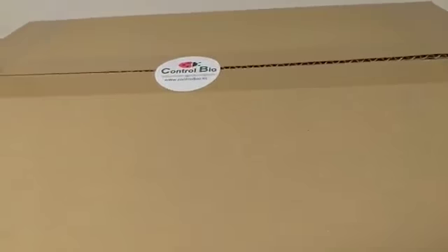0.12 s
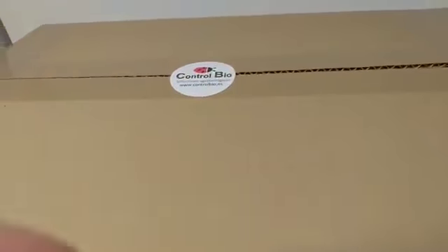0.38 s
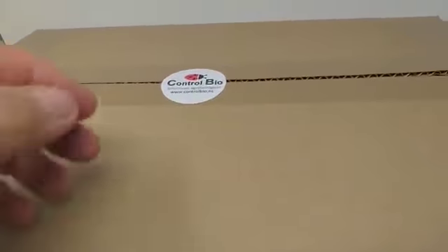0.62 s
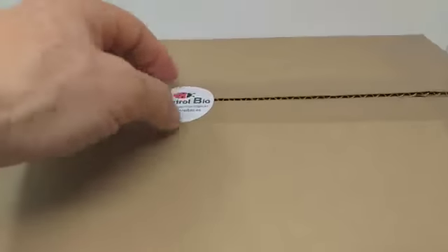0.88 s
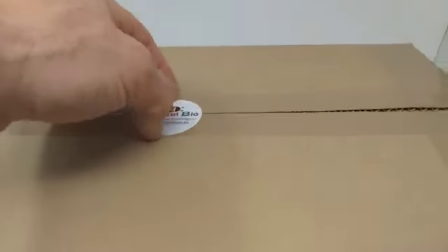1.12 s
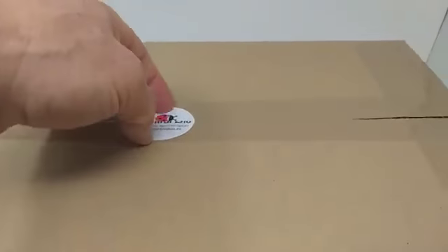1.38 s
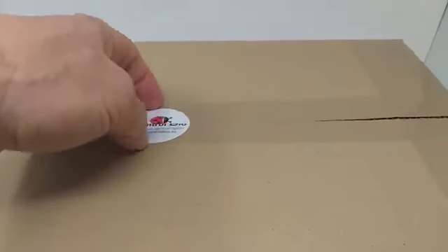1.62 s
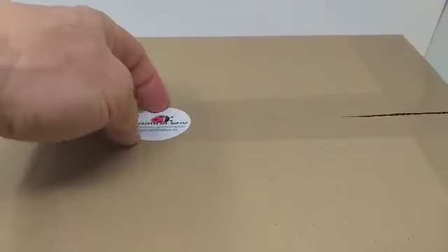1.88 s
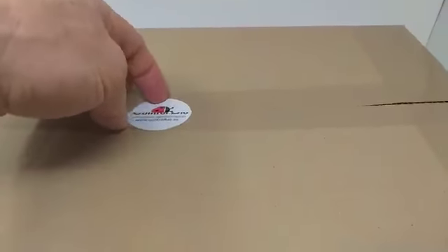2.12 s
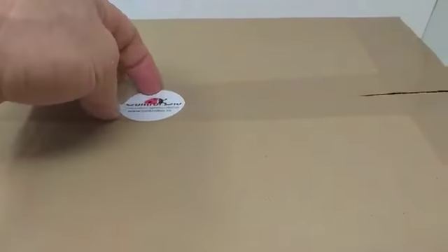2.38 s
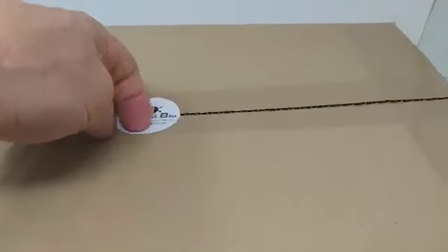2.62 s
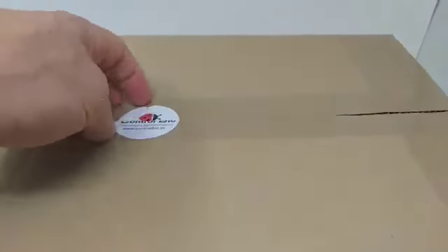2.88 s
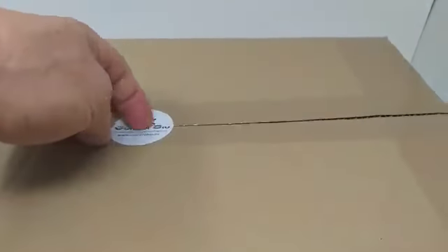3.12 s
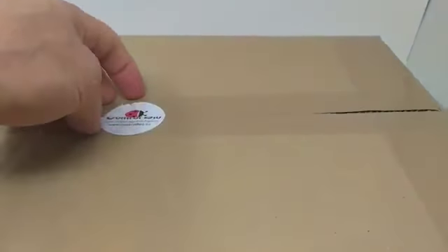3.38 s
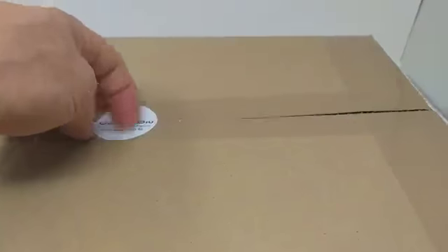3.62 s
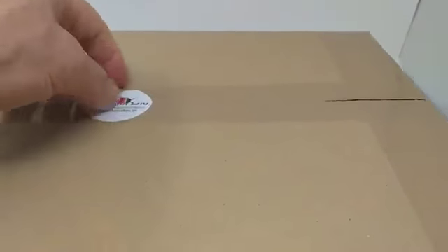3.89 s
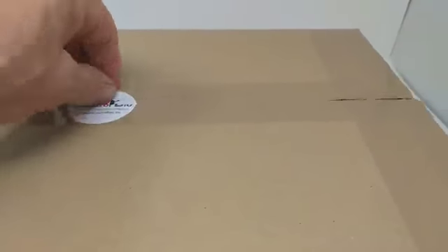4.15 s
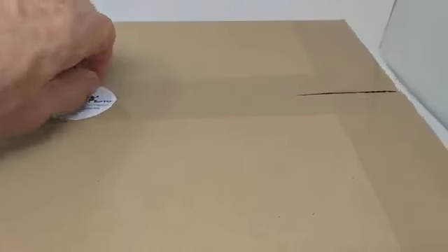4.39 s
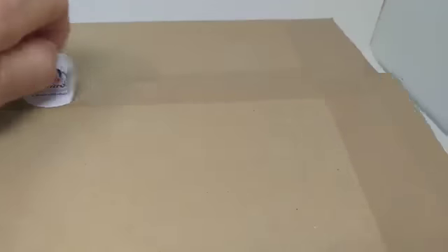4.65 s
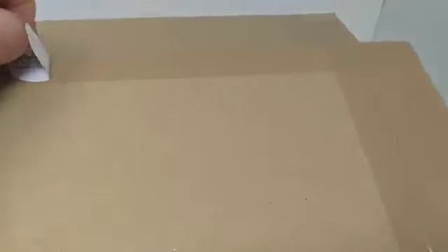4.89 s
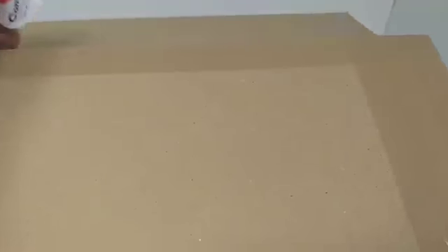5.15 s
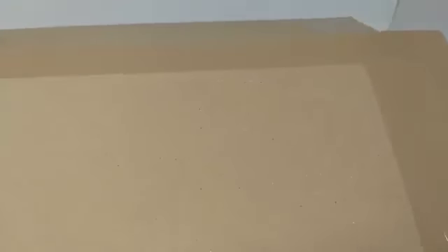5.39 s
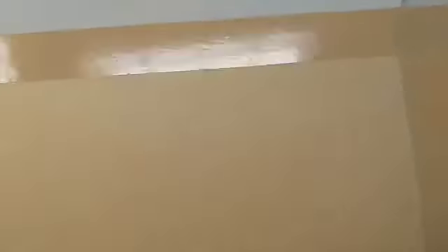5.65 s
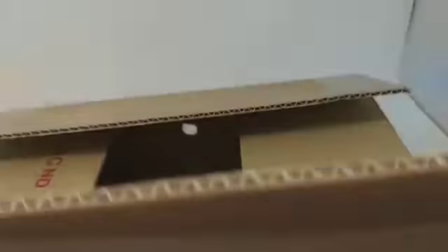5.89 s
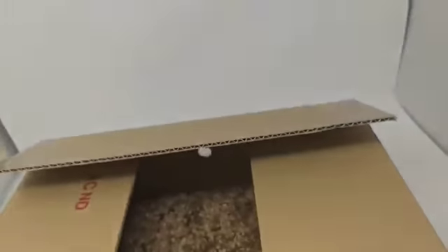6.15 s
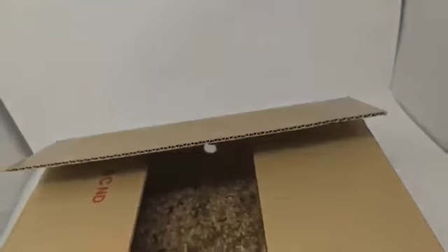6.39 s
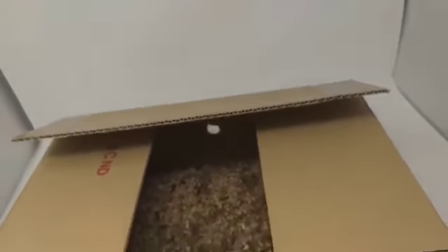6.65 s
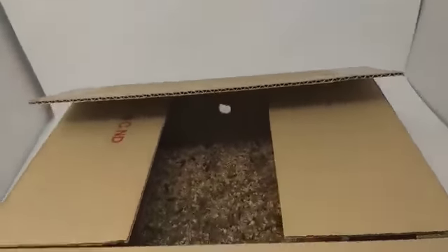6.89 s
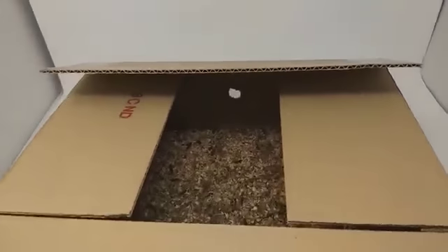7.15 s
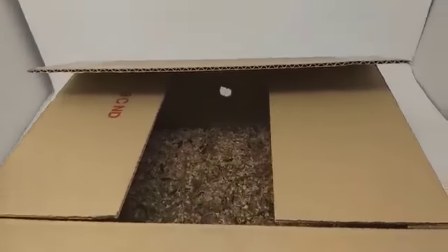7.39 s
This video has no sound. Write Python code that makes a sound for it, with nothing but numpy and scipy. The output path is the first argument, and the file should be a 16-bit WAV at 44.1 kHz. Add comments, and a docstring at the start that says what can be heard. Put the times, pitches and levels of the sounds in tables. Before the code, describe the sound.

Fingernail scrapes and hollow thumps on a cardboard box, then a seal ripped off in two crackling bursts, then soft hissing flap slides.

```python
"""First a finger rubs and its nail catches on a paper seal on a hollow cardboard box, and the lid thumps.
Then the seal is peeled off in jerks: each slip of the glue is a click with a crackling tail.
Last, the lifted flaps slide on each other with a bright hiss and two wandering resonances.
Each contact is rough noise that also shakes the board panels and makes the hollow box boom.
Throughout: a small hard-walled room, a faint electrical whine and the hiss of a close mono microphone."""
import sys
import numpy as np
from scipy import signal
from scipy.fft import rfft, irfft
from scipy.io import wavfile

SR = 44100
rng = np.random.default_rng(int(sys.argv[2]) if len(sys.argv) > 2 else 0)


def convert_level_to_amplitude(level_db):
    """Map a level in decibels to its linear amplitude factor."""
    exponent = np.asarray(level_db, float) / 20
    return 10 ** exponent


def dump_mix(stems):
    """Bounce the given channels to the path in sys.argv[1] as a 16-bit WAV at rate SR."""
    frames = np.atleast_2d(stems).T  # one column per channel
    limited = np.clip(frames, -1, 1)  # hard clip at full scale
    pcm = np.round(limited * 32767).astype(np.int16)
    wavfile.write(sys.argv[1], SR, pcm)


N = 331632   # length in samples


# a finger slides on the lid, or the box rumbles on after a thump; one row each: start_s, held_s,
# surface_hiss_db, panel_db, cavity_db
RUBS_AND_RUMBLES = [(0.765, 0.083, -36.5, -47.5, -58), (0.875, 0.04, -46.5, -48, -54.5),
                    (0.95, 0.049, -54.5, -66, -45), (1.03, 0.07, -61, -73, -57.5), (1.14, 0.017, -58, -61, -44),
                    (1.455, 0.022, -33, -32, -31), (1.625, 0.024, -54.5, -50.5, -57),
                    (1.805, 0.012, -58.5, -60, -38), (1.855, 0.012, -54, -51, -51), (1.95, .01, -50.5, -55, -35),
                    (2.03, 0.073, -57, -68.5, -47.5), (2.44, 0.028, -69, -63.5, -69),
                    (2.6, 0.012, -45, -38.5, -26), (2.67, .12, -55, -59, -48.5), (3.0, 0.037, -52, -49, -35.5),
                    (3.18, .01, -48.5, -49.5, -31), (3.58, 0.019, -55.5, -65.5, -37.5),
                    (3.622, 0.0041, -32.5, -40, -41), (3.69, 0.0087, -61, -59.5, -24),
                    (3.9, 0.13, -57, -69, -56), (4.05, 0.056, -66.5, -64.5, -60.5),
                    (4.275, 0.043, -64, -65.5, -59), (4.735, 0.043, -43.5, -45.5, -36.5),
                    (4.87, 0.077, -52, -62, -56)]
# the hand lies on the lid: start_s, held_s, surface_hiss_db, panel_db, cavity_db
HAND_RESTS = [(0.8, 5, -86, -90, -65.5)]
# how a rub swells, falls and trails off; each list holds: surface, panel, cavity
RUB_RISE_DB_PER_S = [1699.5, 1499.5, 702]   # swell [dB per s]
RUB_FALL_DB_PER_S = [308, 399.5, 321.5]   # fast fall [dB per s]
RUB_TAIL_DB = [-32, -27, -15.5]   # where the slow tail starts, against the held level [dB]
RUB_TAIL_DB_PER_S = [72.5, 96.5, 73]   # fall of that tail [dB per s]
# the nail or a flap edge catches and scrapes free: start_s, surface_peak_db (nominal), panel_db, t60_s
CATCHES = [(0.1054, -21.5, -52, 0.023), (0.7535, -46, -70, 0.032), (1.1838, -35.5, -45, 0.051),
           (1.403, -22.5, -49, 0.028), (1.412, -34, -46, .15), (1.4247, -18, -23.5, 0.071),
           (1.5946, -40, -49, 0.079), (1.652, -34, -43, 0.045), (1.922, -22, -24, 0.039),
           (2.0226, -36, -42.5, 0.055), (2.2984, -42, -43, 0.052), (2.424, -42.5, -53.5, 0.051),
           (2.5391, -11.5, -15, 0.063), (2.5554, -18, -25, 0.11), (2.573, -14.5, -32, 0.1),
           (2.5863, -12.5, -27.5, 0.077), (2.9751, -28.5, -32.5, 0.067), (3.0869, -24, -42, 0.067),
           (3.1225, -8, -22, 0.092), (3.1567, -27, -29.5, 0.11), (3.1673, -18, -42, 0.076),
           (3.3121, -27.5, -54.5, 0.069), (3.398, -37, -51, 0.031), (3.5092, -31.5, -39.5, 0.12),
           (3.5636, -14.5, -14.5, 0.041), (3.6386, -30, -28, 0.03), (3.6438, -11.5, -17.5, 0.086),
           (3.6574, -20.5, -37, 0.11), (0.972, -31, -41, 0.035), (3.845, -46, -75, 0.21),
           (3.965, -47, -65, 0.059), (4.016, -47, -63, 0.049), (5.644, -32, -83, 0.044),
           (5.7762, -42, -68, 0.055), (5.8555, -43, -83.5, 0.05), (5.891, -43, -85.5, 0.062),
           (6.1454, -23, -64, 0.078), (6.2911, -31.5, -72, 0.083), (6.716, -15, -49, 0.029),
           (6.867, -21, -78.5, 0.058), (7.262, -13, -33, 0.12)]
# colour of rubbed paper: pitch_hz, relative level_db per Hz
PAPER_COLOUR = [(1470, -32), (2450, -14), (3300, -3.5), (4200, -5), (5300, -3.5), (5970, -5.5), (6730, 1.5),
                (8610, -1.5), (9780, -16), (13100, -12), (15000, -10.5)]
RUB_LOW_HZ = 880   # light rubbing hardly moves the slow panel modes
FIRM_DB = -43   # pressure up to this bends the lid locally (upper modes), more moves all of it


def fingers():
    """Rubbing skin and a catching nail make rough noise that drives surface, panels and cavity."""
    rub_surface, rub_panel, rub_cavity = strokes(
        RUBS_AND_RUMBLES + HAND_RESTS, RUB_RISE_DB_PER_S, RUB_FALL_DB_PER_S, RUB_TAIL_DB, RUB_TAIL_DB_PER_S)
    catch_surface, catch_panel = bursts(CATCHES, crest_db=11, rise_s=0.0033, snap=0.43, snap_s=0.0064)
    grip = flutter(80, depth_db=1.5)
    fibres = crackle(4000, spread_db=2.0, smooth=0.94)
    surface = np.hypot(grip * rub_surface, catch_surface * flutter(200, depth_db=3.5))
    high_pass = signal.butter(1, RUB_LOW_HZ, "high", fs=SR, output="sos")
    light = signal.sosfilt(high_pass, grip * rub_panel * fibres)
    gentle = np.minimum(rub_cavity, convert_level_to_amplitude(FIRM_DB))
    firm = rub_cavity - gentle
    boom = cavity(gentle * fibres, tilt_db=3.0) + cavity(firm * fibres, tilt_db=0.0)
    scrape = patchy(coloured(surface * fibres, PAPER_COLOUR), 16.0, depth_db=3.0)
    return scrape + shaken(light + catch_panel * fibres) + boom


# the glue lets go in jerks: start_s, surface_peak_db (nominal)
SLIPS = [(4.403, -11.5), (4.4316, -9), (4.458, -11), (4.4915, -16), (4.4958, -7.5), (4.507, -4.5),
         (4.5379, -5), (4.5551, -4.5), (4.5735, -2.5), (4.5987, 0), (4.6103, -4), (4.6317, -1), (4.6394, 2),
         (4.648, -4), (4.6664, 3), (4.67, 2), (4.68, -4), (4.6895, 2.5), (4.7206, -5), (4.797, -26.5),
         (4.812, -2.5), (4.8262, -4), (4.8394, -11.5), (5.003, -34), (5.0269, -9), (5.0365, -1.5),
         (5.0466, -8), (5.054, -8), (5.059, -4.5), (5.064, 0.5), (5.07, 3.5), (5.075, -1), (5.0806, -0.5),
         (5.0903, -3), (5.0971, 1.5), (5.119, -4)]
# how long a slip crackles on: time_s, t60_s
SLIP_T60 = [(4.4, 0.065), (4.6, 0.1), (4.72, 0.054), (5.03, 0.062), (5.06, 0.032), (5.1, 0.061),
            (5.12, 0.061)]
# pull of a slip on the panels: time_s, level_db against the surface peak
SLIP_TUG = [(4.4, -26.5), (4.49, -29.5), (4.55, -21), (4.69, -17.5), (4.82, -23), (5.12, -27)]
# fast pulls, where the slips run together: start_s, held_s, crackle_db, panel_db, seal_ring_db
TEARS = [(4.655, 0.033, -21.5, -25, -23), (5.058, .04, -25, -39.5, -20)]
# how a fast pull swells and falls; each list holds: crackle, panel, seal ring
TEAR_RISE_DB_PER_S = [653.5, 403, 652]   # swell [dB per s]
TEAR_FALL_DB_PER_S = [601, 497.5, 601]   # fall, also of the tail [dB per s]
# the taut seal rings where its free length puts it: time_s, pitch_hz
SEAL_RING = [(4.4, 4400), (4.48, 4000), (4.5, 2900), (4.573, 4500), (4.6, 2700), (4.64, 3400), (4.69, 3600),
             (4.72, 3500), (4.82, 4300), (5.04, 4000), (5.077, 4247), (5.12, 4380)]
# colour of tearing glue: pitch_hz, relative level_db per Hz
GLUE_COLOUR = [(900, -34), (1470, -17.5), (2500, -10.5), (4520, -4.5), (5060, -8), (7030, 0.5), (8740, -5),
               (9860, -15), (15000, -7)]
CRACK_DB = 7.5   # the single sharp click that opens each slip, over the slip's surface peak
SEAL_WIDTH_HZ, SEAL_SNAP_DB = 1200, -8.5   # width of the seal's ring; part of each slip that rings it
PEEL_TILT_DB, PEEL_LOW_HZ = 9.5, 163   # dB per octave, Hz: small quick tugs favour the upper box modes


def peeling():
    """Each slip of the glue line is a snap with a crackling tail that also shakes the box."""
    slip_s, slip_db = np.transpose(SLIPS)
    tug_db = slip_db + np.interp(slip_s, *np.transpose(SLIP_TUG))
    slip_t60 = np.interp(slip_s, *np.transpose(SLIP_T60))
    slips = list(zip(slip_s, slip_db, tug_db, slip_t60))
    slip_surface, slip_panel = bursts(slips, crest_db=12.0, rise_s=0.00015, snap=2.2, snap_s=0.00031)
    tears = strokes(TEARS, TEAR_RISE_DB_PER_S, TEAR_FALL_DB_PER_S, [-30] * 3, TEAR_FALL_DB_PER_S)
    tear_surface, tear_panel, tear_seal = tears * flutter(250, depth_db=2.0)
    surface = np.hypot(slip_surface, tear_surface)
    panels = np.hypot(slip_panel, tear_panel)
    glue = crackle(2500, spread_db=5.0, smooth=1.1)
    cracks = np.zeros(N)
    cracks[(slip_s * SR).astype(int)] = convert_level_to_amplitude(slip_db + CRACK_DB)
    seal = np.hypot(tear_seal, convert_level_to_amplitude(SEAL_SNAP_DB) * slip_surface)
    ring = moving_ring(seal * glue + convert_level_to_amplitude(SEAL_SNAP_DB) * cracks, SEAL_RING, SEAL_WIDTH_HZ)
    boom = cavity(convert_level_to_amplitude(1.0) * panels * glue, tilt_db=PEEL_TILT_DB)
    boom = signal.sosfilt(signal.butter(2, PEEL_LOW_HZ, "high", fs=SR, output="sos"), boom)
    tearing = patchy(coloured(surface * glue + cracks, GLUE_COLOUR), 60.0, depth_db=1.5)
    return tearing + ring + shaken(panels * glue) + boom


# the lifted flaps slide on each other: start_s, held_s, hiss_db, low_flap_ring_db, cavity_db
FLAP_STROKES = [(5.14, 0.0071, -39.5, -58, -42), (5.18, 0.032, -49, -68, -60),
                (5.24, 0.059, -55.5, -73, -74), (5.37, 0.083, -44.5, -60.5, -51.5),
                (5.52, 0.044, -61, -77, -64), (5.99, 0.097, -57.5, -93.5, -85.5),
                (6.16, 0.067, -41.5, -59, -60), (6.27, 0.15, -52, -62, -74),
                (6.47, 0.085, -49, -71.5, -72.5), (6.65, 0.023, -58, -72, -68.5),
                (6.695, 0.03, -36, -58.5, -62), (6.76, 0.14, -43.5, -64, -65),
                (6.92, .17, -41.5, -59.5, -59), (7.19, 0.019, -42, -55, -57),
                (7.268, 0.0079, -39, -38, -54.5), (7.35, 0.023, -46.5, -49.5, -54),
                (7.405, 0.0035, -33, -36.5, -45.5)]
# how a slide swells, falls and trails off; each list holds: hiss, low flap ring, cavity
FLAP_RISE_DB_PER_S = [345, 698.5, 400]   # swell [dB per s]
FLAP_FALL_DB_PER_S = [527, 559, 264]   # fast fall [dB per s]
FLAP_TAIL_DB = [-32, -53, -24]   # where the slow tail starts, against the held level [dB]
FLAP_TAIL_DB_PER_S = [9, 68, 34]   # fall of that tail [dB per s]
# the lower flap ring: time_s, pitch_hz
FLAP_LOW_RING = [(5.2, 1150), (6.2, 1084), (6.45, 1127), (6.72, 1150), (7.051, 1192), (7.27, 1129),
                 (7.42, 1085)]
# the upper flap ring wanders as the flap bends: time_s, pitch_hz, level_db against the hiss
FLAP_HIGH_RING = [(5.25, 1910, -14), (5.38, 1950, -11), (5.5, 1900, -13.5), (5.7, 1933, -3),
                  (6.161, 1944, -12), (6.319, 1763, -5.5), (6.549, 1787, -16), (6.718, 2037, -25),
                  (6.85, 1520, -19), (6.97, 2150, -14), (7.269, 1760, -16), (7.449, 1897, -15)]
# colour of rubbed board: pitch_hz, relative level_db per Hz
BOARD_COLOUR = [(1350, -37), (1500, -12), (2250, -14.5), (2600, -19), (2850, -14.5), (3250, -9.5),
                (3900, -10), (4800, -3), (5500, -2.5), (6400, -5), (7290, -0.5), (8900, -10),
                (10100, -21.5), (12900, -12), (15000, -12)]


def flaps():
    """Board slides on board: bright hiss, two broad flap resonances and the cavity below."""
    hiss, low, boom = strokes(
        FLAP_STROKES, FLAP_RISE_DB_PER_S, FLAP_FALL_DB_PER_S, FLAP_TAIL_DB, FLAP_TAIL_DB_PER_S)
    ring_s, ring_hz, ring_db = np.transpose(FLAP_HIGH_RING)
    high = hiss * convert_level_to_amplitude(np.interp(np.arange(N) / SR, ring_s, ring_db))
    fibres = flutter(60, depth_db=1.5) * crackle(2500, spread_db=3.0, smooth=0.97)
    low_force = low * fibres * flutter(20, depth_db=1.5)
    high_force = high * fibres * flutter(20, depth_db=6.0)
    rung = moving_ring(low_force, FLAP_LOW_RING, width_hz=230)
    rung += moving_ring(high_force, np.c_[ring_s, ring_hz], width_hz=360)
    rung += shaken(convert_level_to_amplitude(-10) * np.hypot(low, high) * fibres)   # the other panels shake along
    rubbing = patchy(coloured(hiss * fibres, BOARD_COLOUR), 14.0, depth_db=3.5)
    return rubbing + rung + cavity(boom * fibres, tilt_db=6.5)


# the lid springs back under the finger: start_s, peak_db, strongest pitch_hz, build_up_s
THUMPS = [(1.178, -28, 231, 0.019), (1.427, -18.5, 220, 0.0044), (1.432, -23.5, 125, 0.0013),
          (1.797, -32, 200, 0.023), (1.921, -19.5, 344, 0.0049), (2.025, -29.5, 267, 0.0045),
          (2.541, -5, 357, 0.0064), (2.552, 5.5, 155, 0.002), (2.979, -17.5, 133.6, 0.0084),
          (3.124, -12.5, 343, 0.01), (3.1364, -1, 150, 0.0015), (3.178, -17.5, 132, 0.0075),
          (3.563, -16, 350, 0.0039), (3.568, -9.5, 130.3, 0.004), (3.646, -9.5, 320, 0.0027),
          (3.6585, 6, 168, 0.0018), (2.299, -41.5, 215, 0.008), (2.734, -34, 135, 0.012),
          (3.398, -33.5, 148, 0.0062), (3.509, -24.5, 142, 0.011), (4.015, -44.5, 200, 0.0089),
          (5.034, -20, 201, 0.0068), (5.109, -27.5, 126.2, .02), (5.17, -42, 129.6, 0.021),
          (5.375, -47.5, 125, 0.0099), (5.456, -46, 486, .03), (5.637, -52, 128.6, 0.0095),
          (5.668, -41.5, 127, 0.0042), (7.427, -44, 127, 0.0076)]
# the box as a drum, one row a mode: pitch_hz, relative level_db, t60_s (before the hand shortens it)
BOX_MODES = [(106, -15.5, 0.29), (111, -2.5, 0.15), (129.8, 4.5, 0.12), (133, 2.5, 0.089),
             (188, -0.5, 0.078), (219, 4, 0.052), (273, -4, 0.037), (341.6, -11, 0.11), (350, -13.5, 0.14),
             (460, -10, 0.067)]
RING_LEFT, RING_LOST_PER_OCTAVE = 1, 0.23   # share of ring time the hand leaves; high pushes keep less


def thumps(spread_octaves=0.45):
    """Each push builds up, favours the modes near its own pitch, and the hand shortens their ring."""
    t = np.arange(SR // 2) / SR
    out = np.zeros(N + SR)
    for start, peak_db, hz, build_s in THUMPS:
        after = np.maximum(t - build_s, 0)
        left = max(RING_LEFT - RING_LOST_PER_OCTAVE * np.log2(hz / BOX_MODES[0][0]), .1)
        ring = np.zeros(len(t))
        for mode_hz, db, t60 in BOX_MODES:
            nearness = np.exp(-.5 * (np.log2(mode_hz / hz) / spread_octaves) ** 2)
            ring += nearness * convert_level_to_amplitude(db - 60 * after / (t60 * left)) * np.sin(2 * np.pi * mode_hz * t)
        ring *= np.minimum(t / max(build_s, .001), 1)
        at = round(start * SR)
        out[at:at + len(t)] -= convert_level_to_amplitude(peak_db) * ring / np.abs(ring).max()   # the lid first moves away
    return out[:N]


def cavity(force, tilt_db):
    """A running force sets all the box modes ringing, tilted per octave; noise of rms 1 gives rms 1."""
    t = np.arange(SR // 2) / SR
    ring = np.zeros(len(t))
    for hz, db, t60 in BOX_MODES:
        tilted_db = db + tilt_db * np.log2(hz / BOX_MODES[0][0])
        ring += convert_level_to_amplitude(tilted_db - 60 * t / t60) * np.sin(2 * np.pi * hz * t)
    return signal.oaconvolve(force, ring / np.sqrt(np.sum(ring ** 2)))[:N]


# colour of shaken board: pitch_hz, relative level_db per Hz
PANEL_COLOUR = [(260, -30.5), (465, 0.5), (610, -8.5), (720, -6), (960, -10), (1240, -6), (1400, -12.5),
                (1550, -8.5), (2230, -17.5), (2800, -16.5), (3640, -52.5), (6160, -120)]


def shaken(force):
    """A force shakes the panels; their colour shifts as the contact moves."""
    return patchy(coloured(force, PANEL_COLOUR), 25.0, depth_db=4.0)


def moving_ring(x, centre, width_hz):
    """A broad resonance whose centre follows (s, Hz) rows; white rms 1 gives rms 1."""
    hz = np.interp(np.arange(N) / SR, *np.transpose(centre))
    slow = signal.sosfilt(signal.butter(3, width_hz / 2, fs=SR, output="sos"), x)
    carrier = np.cos(2 * np.pi * np.cumsum(hz) / SR)   # lifts the slow noise up to the ring's pitch
    return slow * np.sqrt(2 * SR / width_hz) * carrier


def strokes(rows, rise_db_s, fall_db_s, tail_db, tail_db_s):
    """Gains in time for each level column: swell, hold, fast fall and slow tail of all strokes."""
    t = np.arange(0, N + 32, 32) / SR   # one point every 32 samples
    power = 1e-20
    for start, held, *levels in rows:
        before = np.maximum(start - t, 0)
        after = np.maximum(t - start - max(held, 0), 0)
        swell = convert_level_to_amplitude(np.c_[levels] - np.outer(rise_db_s, before))
        tail = convert_level_to_amplitude(np.c_[tail_db] - np.outer(tail_db_s, after)) * (after > 0)
        fall = convert_level_to_amplitude(-np.outer(fall_db_s, after)) + tail
        power = power + (swell * np.minimum(fall, 1)) ** 2
    return np.array([np.interp(np.arange(N) / SR, t, np.sqrt(p)) for p in power])


def bursts(events, crest_db, rise_s, snap, snap_s):
    """Envelopes of surface and panel: a sharp first snap at each event, then an exponential fall."""
    t = np.arange(SR // 2) / SR
    power = np.zeros((2, N + SR))
    for start, surface_db, panel_db, t60 in events:
        fall = convert_level_to_amplitude(-60 * t / max(t60, .005))
        shape = (1 - np.exp(-t / rise_s)) * fall * (1 + snap * np.exp(-t / snap_s))
        levels = convert_level_to_amplitude(np.array([[surface_db - crest_db], [panel_db]]))   # crest: peak over rms
        at = round(start * SR)
        power[:, at:at + len(t)] += (levels * shape) ** 2
    return np.sqrt(power[:, :N])


def crackle(per_s, spread_db, smooth):
    """Random snaps of uneven size over a share of smooth noise; rms 1."""
    sizes = convert_level_to_amplitude(spread_db * np.minimum(rng.exponential(1, N), 4)) * rng.choice([-1, 1], N)
    snaps = rms_one(sizes * (rng.random(N) < per_s / SR))
    return rms_one(snaps + smooth * rng.standard_normal(N))


def flutter(per_s, depth_db):
    """A gain that wanders as the contact grips and loosens."""
    knots = rng.standard_normal(int(N / SR * 400) + 2)   # enough for the fastest flutter
    place = np.arange(N) / SR * np.clip(per_s, 1, 399)
    return convert_level_to_amplitude(depth_db * np.interp(place, np.arange(len(knots)), knots))


def patchy(x, per_s, depth_db):
    """Half-octave bands swell and sink on their own as the contact patch shifts."""
    edges = 700 * 2 ** np.arange(0, 4.6, .5)   # Hz
    extra = np.zeros(N)
    for low, high in zip(edges, edges[1:]):
        band = signal.sosfilt(signal.butter(1, [low, high], "band", fs=SR, output="sos"), x)
        extra += (flutter(per_s, depth_db) - 1) * band
    return x + extra


def coloured(x, spectrum):
    """Causal (minimum-phase) filter with the given spectrum; white rms 1 stays rms 1."""
    size, points = 8192, np.array(spectrum)
    hz = np.maximum(np.arange(size // 2 + 1) * SR / size, 1)
    gain = convert_level_to_amplitude(np.interp(np.log(hz), np.log(points[:, 0]), points[:, 1]))
    cepstrum = irfft(np.log(gain))
    cepstrum[1:size // 2] *= 2   # folding the cepstrum puts the energy as early as possible
    cepstrum[size // 2 + 1:] = 0
    response = irfft(np.exp(rfft(cepstrum)))
    return signal.oaconvolve(x, response / np.sqrt(np.sum(response ** 2)))[:N]


def rms_one(x):
    """Scale to rms 1, so that a later gain sets the level."""
    return x / np.sqrt(np.mean(x ** 2) + 1e-20)


def handling():
    """Everything the hand does to the box, added up as sound pressures add."""
    return fingers() + peeling() + flaps() + thumps()


ROOM_DB, ROOM_T60_S, ROOM_LOW_HZ, ROOM_CUT_HZ = -15.5, 0.14, 220, 4100


def room(x):
    """Close walls: a short, dense tail, thin in the bass and dull on top."""
    t = np.arange(SR // 2) / SR
    tail = rng.standard_normal(len(t)) * convert_level_to_amplitude(-60 * t / ROOM_T60_S) * (t > .004)   # silent for 4 ms
    band = signal.butter(2, [ROOM_LOW_HZ, ROOM_CUT_HZ], "band", fs=SR, output="sos")
    tail = signal.sosfilt(band, tail)
    return convert_level_to_amplitude(ROOM_DB) * signal.oaconvolve(x, tail / np.sqrt(np.sum(tail ** 2)))[:N]


# colour of the steady hiss and rumble: pitch_hz, relative level_db per Hz
HISS_COLOUR = [(30, -6.5), (100, 2), (300, -12.5), (450, -14.5), (600, -18), (1300, -22), (2000, -14),
               (2450, -26), (3100, -11.5), (3700, -22), (6100, -19), (7800, -8), (8800, -13.5),
               (9400, -27.5), (14000, -31)]
HISS_DB = -64.5   # rms
# thin whining tones: pitch_hz, rms level_db before the swell
WHINE = [(2821, -88), (3015, -77.5), (8457, -90)]
# the whine's level wanders: time_s, added level_db
WHINE_SWELL = [(0, 10), (.5, 4.5), (2.4, 8.5), (3.9, 6.5), (4.3, 0.5), (7.52, 0.5)]


def background():
    """Steady coloured noise for hiss and rumble, with sine tones whose level wanders for the whine."""
    t = np.arange(N) / SR
    tones = np.zeros(N)
    for hz, db in WHINE:
        tones += convert_level_to_amplitude(db) * np.sqrt(2) * np.sin(2 * np.pi * (hz * t + rng.random()))
    whine = tones * convert_level_to_amplitude(np.interp(t, *np.transpose(WHINE_SWELL)))
    return convert_level_to_amplitude(HISS_DB) * coloured(rng.standard_normal(N), HISS_COLOUR) + whine


MIC_LOW_HZ = 101


def scene():
    """One small microphone, deaf to deep bass, feeds both channels; its own hiss comes after."""
    box = handling()
    bass_cut = signal.butter(4, MIC_LOW_HZ, "high", fs=SR, output="sos")
    heard = signal.sosfilt(bass_cut, box + room(box))
    return np.tile(heard + background(), (2, 1))


def band_limit(x):
    """A steep low-pass at the top of the band."""
    return signal.sosfilt(signal.butter(12, 16340, fs=SR, output="sos"), x)


def record(dry):
    """The loudest peaks are softly rounded, then a steep low-pass cuts the very top."""
    rounded = 1.182 * np.tanh(dry / 1.516)
    top_cut = signal.cheby2(14, 45, 15200, fs=SR, output="sos")   # 45 dB down from 15200 Hz
    heard = signal.sosfilt(top_cut, rounded)
    return band_limit(np.clip(heard, -.99, .99))


dry = scene()
out = record(dry)
dump_mix(out)
```